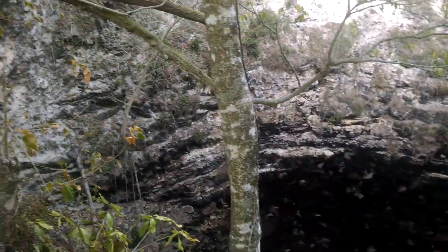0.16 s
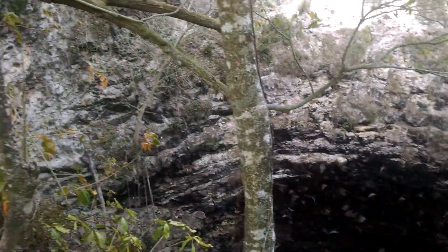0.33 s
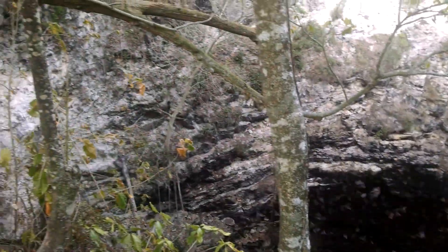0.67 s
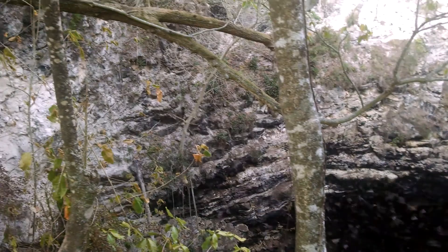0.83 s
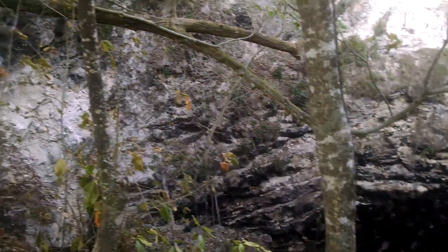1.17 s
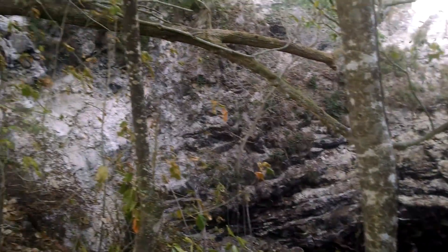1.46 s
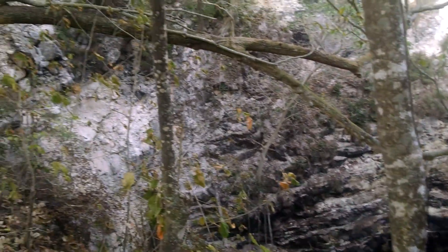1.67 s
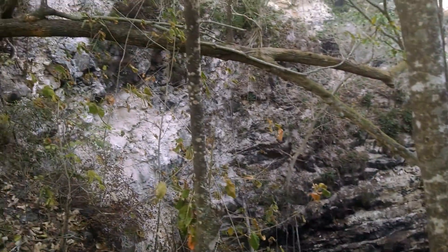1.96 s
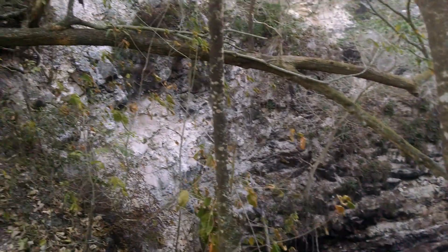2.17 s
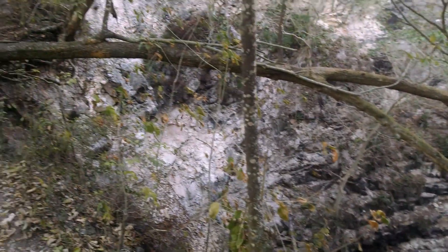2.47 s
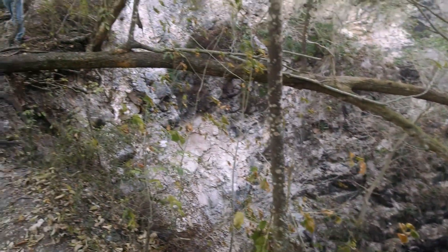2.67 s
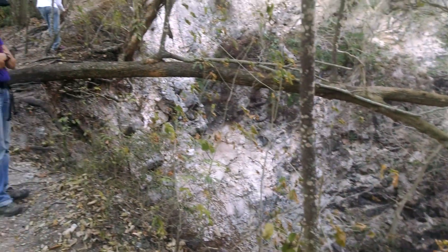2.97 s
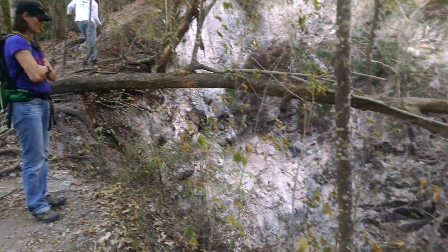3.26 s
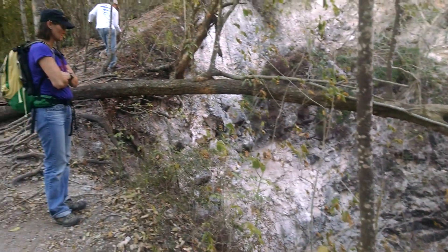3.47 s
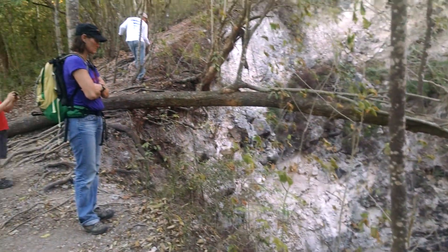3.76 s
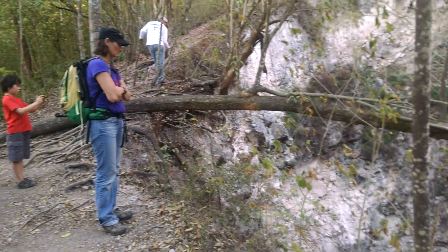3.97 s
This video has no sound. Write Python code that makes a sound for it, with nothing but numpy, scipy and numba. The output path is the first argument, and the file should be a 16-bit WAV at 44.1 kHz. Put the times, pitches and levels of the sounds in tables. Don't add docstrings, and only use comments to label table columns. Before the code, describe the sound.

A huge bat swarm streams from a cave in dry woodland. A continuous shimmering hiss of far calls is dotted with many brief, piercing, falling squeaks, each with a short rocky echo. Wingbeats merge into a soft airy rush. A faint low hum sits behind, stronger on the left, and a dry twig ticks twice near the middle. Phone microphone, squeaks brighter on the right, slightly watery compressed texture.

```python
import sys
import numpy as np
from scipy import signal
from scipy.fft import rfft, irfft
from scipy.io import wavfile
from scipy.ndimage import uniform_filter1d
from numba import njit

SR = 44100
rng = np.random.default_rng(int(sys.argv[2]) if len(sys.argv) > 2 else 0)


def to_linear_factor(level_db):
    exponent = np.asarray(level_db, float) / 20
    return 10 ** exponent


def wrap_up_sound(samples):
    columns = np.atleast_2d(samples).T
    tamed = np.clip(columns, -1, 1)
    steps = np.round(tamed * 32767).astype(np.int16)
    wavfile.write(sys.argv[1], SR, steps)


N = 181495

# frequency in Hz, level in dB.
HUM_TONES = [(61.2, 1.5), (122, -35), (142.7, -10)]
# time in seconds, peak in dB, pitch in Hz, left minus right in dB.
TWIG_TICKS = [
    (2.4979, -31, 850, 0),
    (2.5029, -36, 880, -1),
]
# time in seconds, far calls in dB, wing rush in dB.
SWARM_LEVELS = [(0.0, -39.5, -48), (0.57, -39, -49), (1.05, -41, -49.5), (1.5, -39.5, -48.5),
                (1.94, -40, -49), (2.33, -39, -47), (2.58, -41, -49.5), (2.8, -41, -49), (3.23, -38.5, -48),
                (3.7, -40.5, -49), (4.12, -37.5, -48.5)]
# frequency in Hz, level in dB per Hz.
WING_SPECTRUM = [(25, -7.5), (90, -7.5), (130, -5), (210, 0.54), (480, -1), (700, -3.2), (1000, -8.5),
                 (1500, -13.5), (1800, -12), (2500, -15), (4700, -20.5), (7000, -27), (16000, -41)]
# frequency in Hz, level in dB per Hz.
FAR_SPECTRUM = [(4000, -68.5), (5500, -22), (6500, -14), (8000, -6), (9000, -3), (10000, 1.5), (11000, -1),
                (12000, -5), (13500, -4.5), (14500, -3), (15300, 1.4), (17000, -1.37)]
# frequency in Hz, left minus right in dB, likeness from 0 to 1.
PORT_BALANCE = [(30, 3.5, .2), (90, 1, .35), (200, -1, .78), (500, -2, .68), (900, -3, .8), (1300, 1, .88),
                (1700, 2, .5), (2300, .3, .75), (4000, 0.1, .82), (6700, 0.1, .8), (8000, -2.5, .5),
                (9300, -7, .4), (10200, -10, .38), (12200, -9, .42), (14000, -7.5, .36), (15500, -7, .3)]
# frequency in Hz, lag in turns.
PORT_LAG = [(0, .06), (1100, .05), (1450, 0), (1950, -.33), (2400, -.5), (2700, -.5), (4000, 0), (6700, 1),
            (8050, 1.5), (9200, 2), (10900, 2.5), (12200, 3), (14000, 3.5), (15300, 4), (22050, 6.2)]
# time in seconds, length in ms, end pitch in Hz, peak in dB.
DIVING_CALLS = [(.037, 12.5, 9800, -29), (.04, 11.4, 11200, -24.5), (.047, 8, 12490, -31),
                (.1, 8, 9660, -35), (.209, 4, 12230, -23.5), (.221, 13.5, 9220, -21.5),
                (.316, 7, 10300, -25), (.417, 12, 9760, -29.5), (.497, 8, 11300, -31),
                (.789, 9.4, 10500, -27), (.808, 14, 11200, -26), (.881, 14, 10800, -28),
                (1.144, 7, 13300, -26.5), (1.28, 17, 12700, -32), (1.383, 8, 13000, -27),
                (1.48, 9.9, 12750, -30), (1.528, 6, 11400, -28), (1.616, 10, 9800, -26),
                (1.998, 8, 11000, -29.5), (2.311, 7, 12230, -25), (2.389, 7.4, 12200, -28),
                (2.409, 8, 11600, -27), (2.949, 8, 14060, -28), (3.25, 5.8, 11900, -33),
                (3.263, 5, 9930, -15.5), (3.259, 9.5, 10600, -29), (.707, 14, 11200, -24.5),
                (3.349, 11, 9560, -28), (3.637, 13, 12900, -28), (4.056, 11, 10250, -30)]
# time in seconds, length in ms, end pitch in Hz, peak in dB.
SLIDING_CALLS = [(.033, 12, 9100, -30), (.896, 20, 12100, -37), (1.07, 12, 12300, -37),
                 (3.316, 16, 9500, -27), (.844, 14, 11540, -29), (1., 14, 10740, -29),
                 (1.165, 6.5, 10100, -23), (1.805, 11, 12300, -34), (1.579, 11, 11370, -27),
                 (2.205, 16, 12100, -39), (1.607, 14, 9300, -23), (1.737, 6.9, 12900, -27),
                 (1.899, 19, 10800, -26), (1.904, 15, 12000, -33), (2.3, 9, 12000, -27),
                 (2.325, 17, 9130, -29.5), (2.984, 8.1, 9800, -28), (3.149, 18, 9700, -20),
                 (3.15, 17, 11400, -33), (3.154, 10, 10360, -27), (3.207, 13, 9200, -29),
                 (3.465, 15, 10300, -32), (3.521, 11, 13800, -31), (3.534, 11, 11300, -30),
                 (3.803, 14, 10940, -35), (3.839, 14, 10300, -33), (3.904, 11, 11800, -34.5),
                 (3.933, 22, 9500, -25), (4.045, 13, 9300, -31), (4.074, 14, 10900, -29)]
# time in seconds, length in ms, end pitch in Hz, peak in dB.
GLIDING_CALLS = [
    (.087, 16.6, 9780, -28.5),
    (.13, 11, 9640, -25.5),
    (.6, 24, 10900, -20.5),
    (2.968, 18, 11350, -33),
    (3.01, 22, 12000, -36),
    (3.188, 21, 9950, -31.5),
    (3.684, 8, 11000, -28),
    (3.828, 18, 9850, -25),
]
# time in seconds, length in ms, end pitch in Hz, peak in dB.
LEVEL_CALLS = [(.049, 7.3, 10000, -24), (.135, 9, 12150, -22.5), (.143, 12, 9650, -24.5),
               (.533, 27, 10360, -24.5), (.635, 14, 9600, -25.5), (1.278, 5.4, 9930, -18.5),
               (1.622, 9, 11840, -30), (1.695, 15, 13150, -31), (2.007, 24, 10600, -23),
               (2.073, 10.5, 9340, -30), (2.222, 10, 11650, -24), (2.848, 6.6, 8680, -31),
               (3.069, 20, 9930, -28), (3.42, 13, 10030, -29.5), (3.647, 10, 10500, -33),
               (3.692, 16, 10800, -24), (3.78, 6.6, 10700, -23), (2.385, 20, 10000, -28),
               (2.53, 10, 11900, -31), (3.965, 7.5, 10100, -27)]
# time in seconds, length in ms, end pitch in Hz, peak in dB.
PLUNGING_CALLS = [
    (.627, 4.2, 9400, -20),
]
# frequency in Hz, step in dB over the stronger of sum and difference,
# margin in dB under which the weaker is dropped.
STEREO_STEPS = [(1500, -12, -16), (2100, -6.5, -9), (2700, 0, -5.5), (3400, 2, -3), (5000, 3.5, -3),
                (6200, 3, -4.5), (7200, 0, -6), (8000, -2.5, -6), (9000, -15, -24)]

# fall in Hz per ms, rise before the peak in ms, hook in Hz, swell exponent
DIVE = (190, 9, 1165.0, 1.7)
SLIDE = (80, 7.2, 1690.0, 1.3)
GLIDE = (31, 18, 2400.0, 1.3)
LEVEL = (14.9, 7, 1100.0, 0.96)
PLUNGE = (1350, 0.5, 0.0, 1.0)
PASSING_DB, PASSING_SPREAD_DB, PASSING_HZ = -36, 4, (9520, 13800)
SHADE_DB, SHADE_SPREAD_DB = -11.5, 3.5
ROCK_T60_S, ROCK_DB = 0.1, -6.5
TILT_DB = 2.5
HUM_DB, HUM_FADE_DB, HUM_FADE_S = -59, -7, (2.3, 4.3)
HUM_LAG_RAD = 0.98
TOP_HZ = 15480

TIME, HZ = np.arange(N) / SR, np.fft.rfftfreq(N, 1 / SR)
LEFT_TURN = np.exp(-2j * np.pi * np.interp(HZ, *np.transpose(PORT_LAG)))


def unit(x):
    return x / np.sqrt(np.mean(x ** 2))


def along(table, column):
    rows = np.array(table, float)
    return np.interp(np.log(HZ + 1), np.log(rows[:, 0]), rows[:, column])


def curves(table):
    s, *columns = np.transpose(table)
    return [np.interp(TIME, s, column) for column in columns]


def colour(x, gain):
    return irfft(rfft(x) * gain, N)


def walk(rate):
    hold = int(SR / rate)
    levels = np.repeat(rng.standard_normal(N // hold + 1), hold)
    slewed = uniform_filter1d(uniform_filter1d(levels, hold), hold)
    return unit(slewed[:N])


@njit
def sweeps(start, length, hz0, hz1, size, wobble, warble_hz, swell, hook_hz):
    out = np.zeros(len(wobble))
    for k in range(len(start)):
        phase, first, count = 0., int(start[k]), int(length[k])
        for i in range(max(0, -first), min(count, len(out) - first)):
            u = i / count
            j = (first + i + 997 * k) % len(out)
            glide_hz = hz0[k] + (hz1[k] - hz0[k]) * u
            hook = hook_hz * max(0., 1 - 3 * u) ** 2
            phase += 2 * np.pi * (glide_hz + hook + warble_hz[j]) / SR
            out[first + i] += size[k] * np.sin(np.pi * u ** swell) * wobble[j] * np.sin(phase)
    return out


def hum(level_db):
    lag = np.array([[0], [HUM_LAG_RAD]])
    tone = 0
    for hz, db in HUM_TONES:
        tone = tone + to_linear_factor(db + level_db + 1.0) * np.sin(2 * np.pi * hz * TIME + 0.17 * walk(2.2) + lag)
    return tone * to_linear_factor(np.array([[2], [-2]]))


def snaps():
    out = np.zeros((2, N))
    for s, db, hz, pan_db in TWIG_TICKS:
        t = TIME - s
        swing = -np.cos(2 * np.pi * hz * t)
        crack = swing * np.exp(-(t / 0.0006) ** 2)
        ring = 0.45 * swing * (t > 0) * np.exp(-abs(t) / 0.004)
        out += to_linear_factor(db) * np.array([to_linear_factor(pan_db / 2) * (crack + ring), to_linear_factor(-pan_db / 2) * crack])
    return out


def wings():
    out, noise = 0, rfft(rng.standard_normal(N))
    for hz in 25 * 2 ** np.arange(0, 10, 0.5):
        octaves_off = np.clip(np.log2((HZ + 1) / hz), -0.5, 0.5)
        band = irfft(noise * np.cos(np.pi * octaves_off) ** 2, N)
        out = out + band * to_linear_factor(0.9 * walk(11) + 0.4 * walk(4))
    return unit(colour(out, to_linear_factor(along(WING_SPECTRUM, 1))))


def far_calls(count, tilt_db):
    when, top, steep, long, loud = rng.random((count, 5)).T
    start_hz, seconds = 6000 + 13000 * top, 0.008 + 0.018 * long
    end_hz = start_hz - seconds * (40e3 + 260e3 * steep)
    calls = sweeps(when * N, SR * seconds, start_hz, end_hz,
                   to_linear_factor(8 * loud ** 4), np.ones(N), 130 * walk(350), 1.4, 500.)
    blur = unit(calls) + to_linear_factor(6) * rng.standard_normal(N)
    blur = unit(colour(blur, to_linear_factor(along(FAR_SPECTRUM, 1))))
    high = colour(blur, np.clip((HZ - 10500) / 3000, 0, 1))
    low = blur - high
    return low * to_linear_factor(-tilt_db / 2 + 0.31 * walk(8.66)) + high * to_linear_factor(tilt_db / 2 + 0.15 * walk(4.0))


def ports(direct, scattered):
    like = np.clip(along(PORT_BALANCE, 2), 0, 1)
    left = like * LEFT_TURN * rfft(direct) + np.sqrt(1 - like ** 2) * rfft(scattered)
    return np.array([irfft(left * to_linear_factor(along(PORT_BALANCE, 1)), N), direct])


def rock(x, t60_s):
    t = np.arange(int(0.3 * SR)) / SR
    decay = np.exp(-np.log(1000) * t / t60_s)
    tail = rng.standard_normal(len(t)) * decay * np.minimum(t / 0.0063, 1)
    return signal.fftconvolve(x, tail / np.sqrt(np.sum(tail ** 2)))[:N]


def passing(count, far_db):
    when, long, pitch, loud = rng.random((count, 4)).T
    low_hz, high_hz = PASSING_HZ
    dense_db = far_db[(when * N).astype(int)] - far_db.mean()
    peak_db = PASSING_DB + PASSING_SPREAD_DB * (2 * loud - 1) + 3.0 * dense_db
    return np.transpose([when * N / SR, 7 + 11 * long, low_hz + (high_hz - low_hz) * pitch, peak_db])


def near_calls(far_db):
    tremble, warble_hz = to_linear_factor(2.2 * walk(300)), 130 * walk(350)
    left, right = np.zeros((2, N))
    kinds = ((DIVING_CALLS, DIVE), (SLIDING_CALLS, SLIDE), (GLIDING_CALLS, GLIDE),
             (LEVEL_CALLS, LEVEL), (PLUNGING_CALLS, PLUNGE),
             (passing(75, far_db), DIVE), (passing(50, far_db), SLIDE))
    for table, (steep, rise, hook_hz, swell) in kinds:
        s, ms, hz, db = np.transpose(table).astype(float)
        pan_db = SHADE_DB + SHADE_SPREAD_DB * rng.standard_normal(len(s))
        fall = 0.29 * rise
        db = db - 3.44 - 3.6 * np.exp(-steep / 34)
        start, length = (s - rise / 1000) * SR, (ms + rise + fall) / 1000 * SR
        start_hz, end_hz = hz + steep * (ms + rise), hz - steep * fall
        left = left + sweeps(start, length, start_hz, end_hz, to_linear_factor(db + pan_db),
                             tremble, warble_hz, swell, hook_hz)
        right = right + sweeps(start, length, start_hz, end_hz, to_linear_factor(db),
                               tremble, warble_hz, swell, hook_hz)
    sides = (colour(left, LEFT_TURN), right)
    return np.array([x + to_linear_factor(ROCK_DB) * rock(x, ROCK_T60_S) for x in sides])


def scene():
    far_db, rush_db = curves(SWARM_LEVELS)
    fade = np.interp(TIME, HUM_FADE_S, (0, 1)) ** 3
    hum_db = HUM_DB + HUM_FADE_DB * fade + 1.2 * walk(6.2)
    direct, scattered = (to_linear_factor(rush_db + 3.5) * wings() + to_linear_factor(far_db + 6.5) * far_calls(3000, TILT_DB)
                         for _ in range(2))
    return ports(direct, scattered) + near_calls(far_db) + hum(hum_db) + snaps()


def coarse_spells(count):
    mood = uniform_filter1d(rng.standard_normal(count), size=4)
    return np.where(mood > np.quantile(mood, 0.54), 5.5, -14.)[:, None, None]


def joint_stereo(x, grid, extra_db, spare_db):
    hop, pad, width, count = 1024, 2048 - grid, 8, N // 1024 + 4
    n = np.arange(2 * hop)[:, None] + 0.5
    window = np.sin(np.pi * n / (2 * hop))
    basis = np.sqrt(2 / hop) * window * np.cos(np.pi / hop * (n + hop / 2) * n[:hop].T)
    padded = np.pad([x[0] + x[1], x[0] - x[1]], ((0, 0), (pad, count * hop - N - pad)))
    blocks = padded.reshape(2, count, hop) / 2
    lapped = np.concatenate([blocks[:, :-1], blocks[:, 1:]], axis=2)
    bands = (lapped @ basis).reshape(2, count - 1, -1, width)
    power = np.mean(bands ** 2, axis=3, keepdims=True)
    db = 10 * np.log10(uniform_filter1d(power, size=3, axis=2) + 1e-30)
    hz, step_db, margin_db = np.transpose(STEREO_STEPS)
    centre = (np.arange(hop // width)[:, None] + 0.5) * width * SR / 2 / hop
    wander = uniform_filter1d(rng.standard_normal(db.shape[1:]), size=2, axis=0)
    wander_db = 7.5 * uniform_filter1d(wander, size=3, axis=1)
    stronger_db = uniform_filter1d(db.max(0), size=9, axis=0)
    step = to_linear_factor(stronger_db + np.interp(centre, hz, step_db, -40, -40) + wander_db + extra_db)
    kept = db - db[::-1] > np.interp(centre, hz, margin_db, -99, -99) + spare_db + wander_db / 2
    bands = kept * np.sign(bands) * step * np.floor(abs(bands) / step + 0.4)
    frames = bands.reshape(2, count - 1, hop) @ basis.T
    joined = (frames[:, 1:, :hop] + frames[:, :-1, hop:]).reshape(2, -1)
    mid, side = joined[:, pad - hop:pad - hop + N]
    return np.array([mid + side, mid - side])


def low_pass(x):
    return signal.sosfilt(signal.butter(12, 16860, fs=SR, output="sos"), x)


def record(dry):
    x = signal.sosfilt(signal.ellip(12, 0.3, 70, TOP_HZ, fs=SR, output="sos"), dry)
    x = joint_stereo(x, grid=400, extra_db=4, spare_db=0)
    x = joint_stereo(x, grid=872, extra_db=coarse_spells(N // 1024 + 3), spare_db=-4)
    return low_pass(x)


dry = scene()
out = record(dry)
wrap_up_sound(out)
```